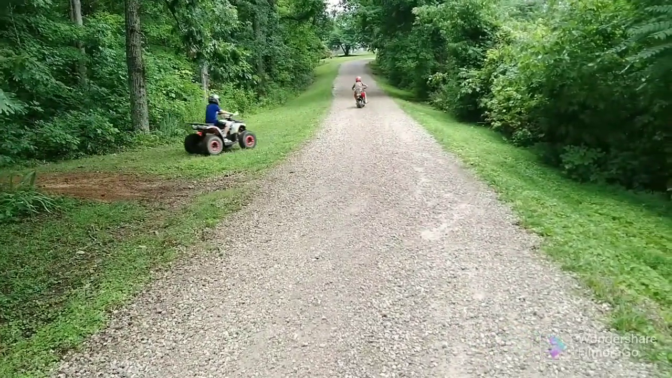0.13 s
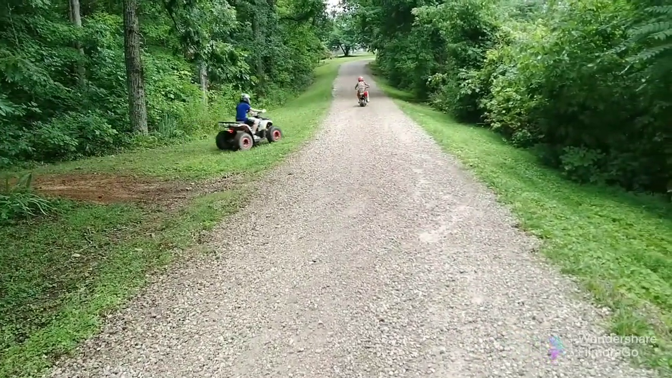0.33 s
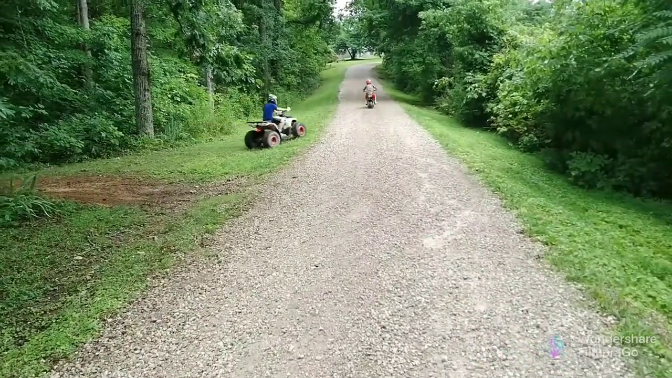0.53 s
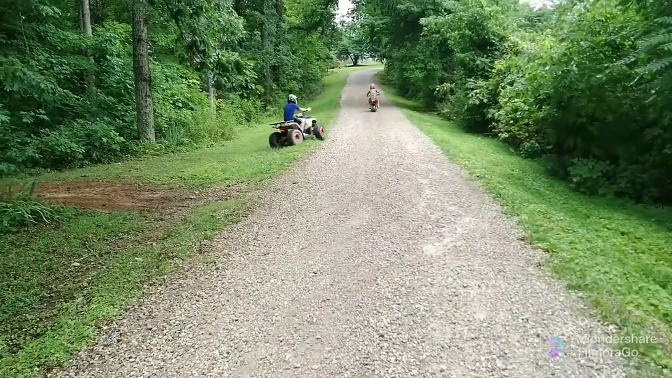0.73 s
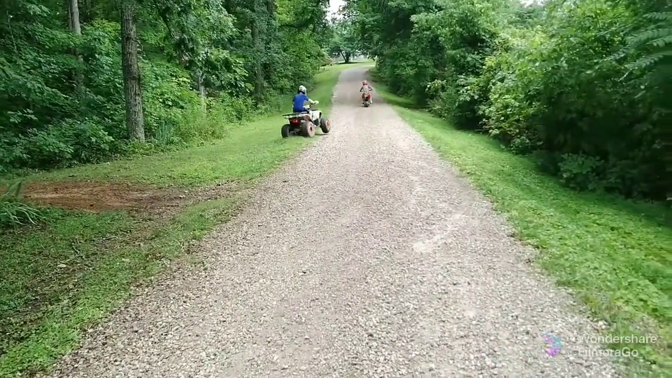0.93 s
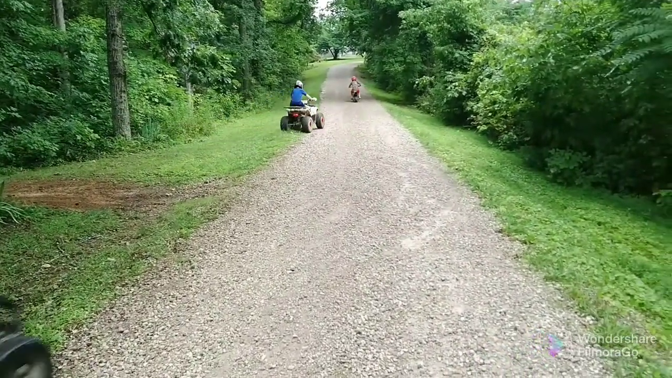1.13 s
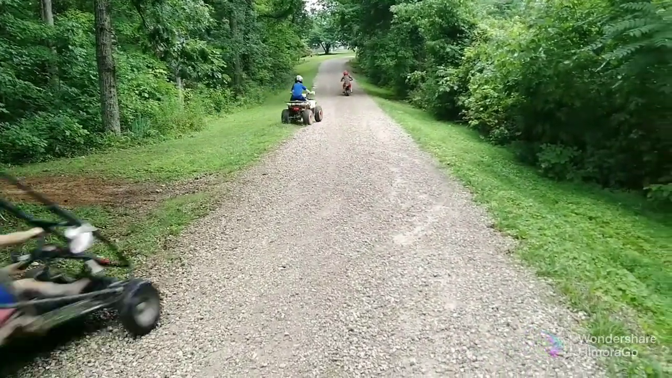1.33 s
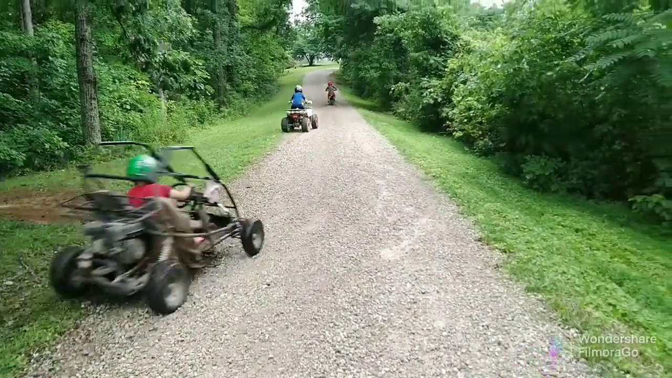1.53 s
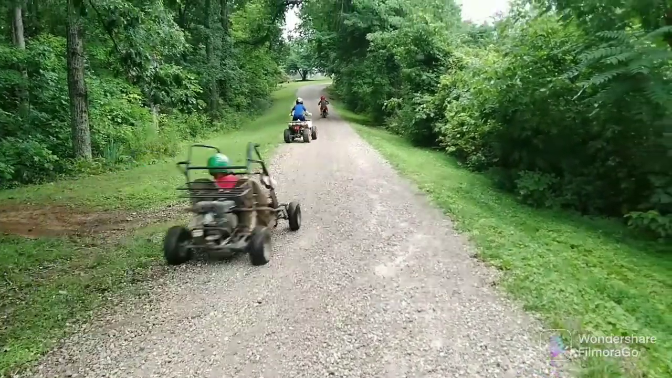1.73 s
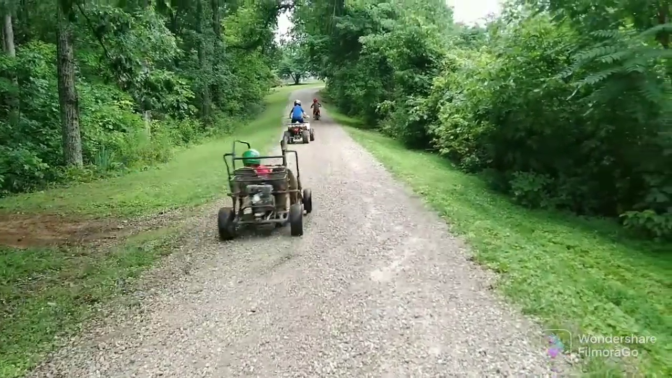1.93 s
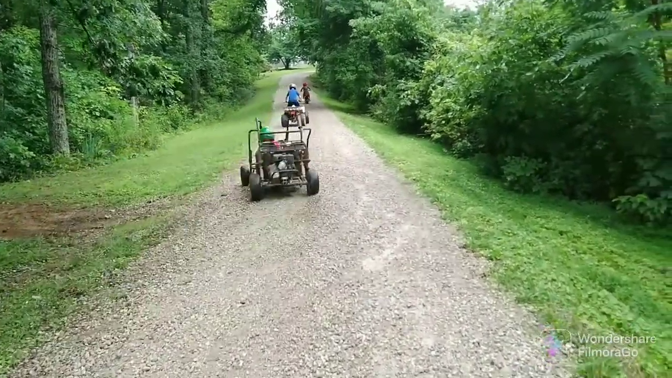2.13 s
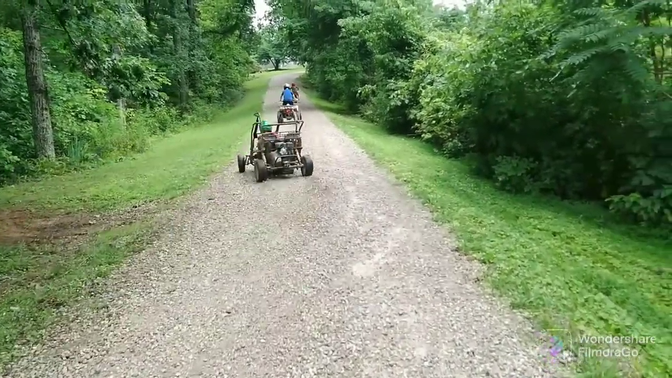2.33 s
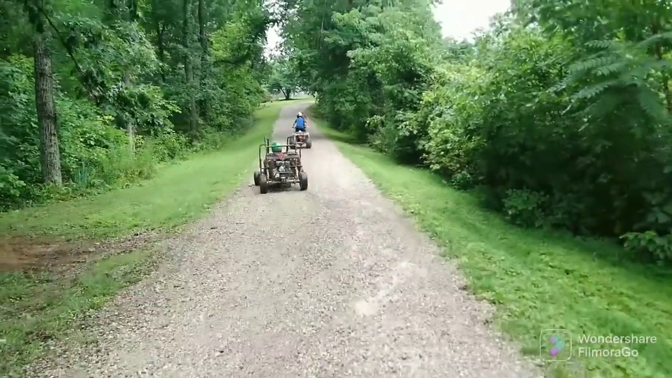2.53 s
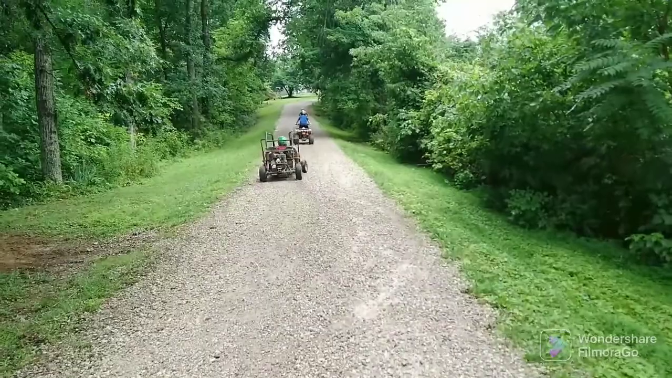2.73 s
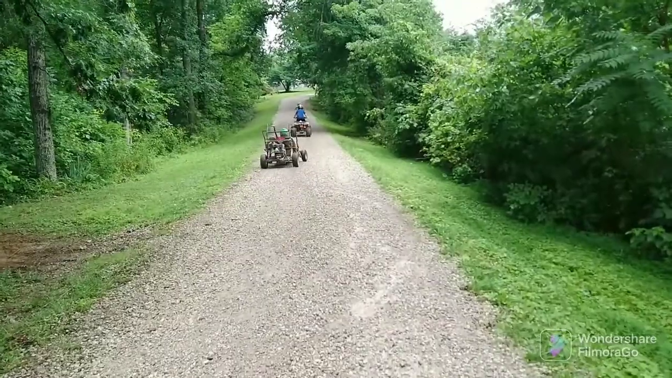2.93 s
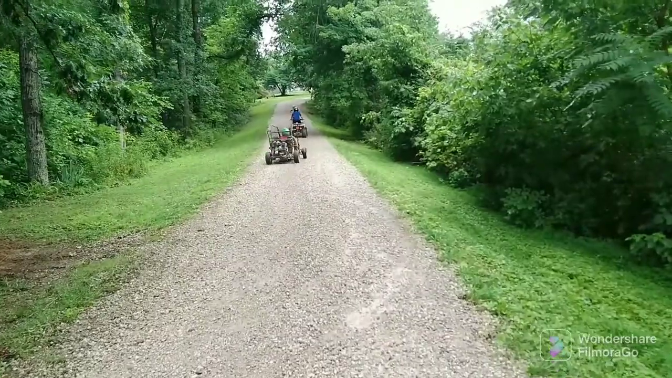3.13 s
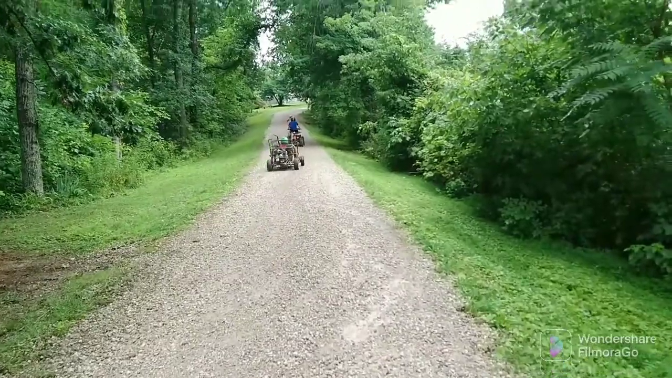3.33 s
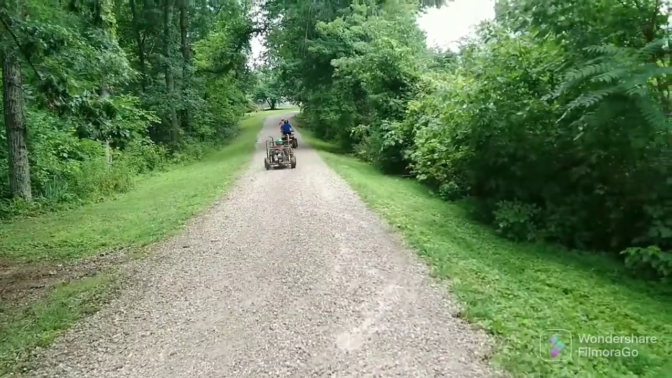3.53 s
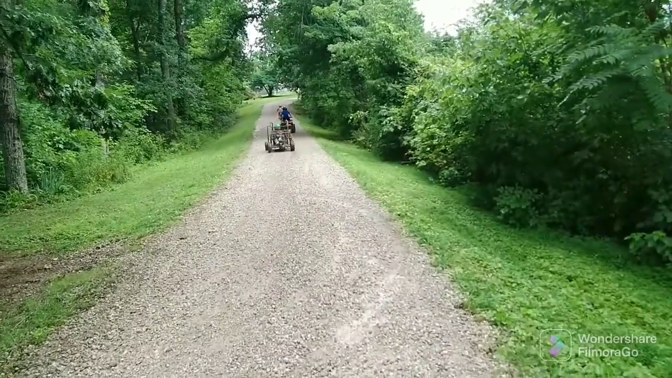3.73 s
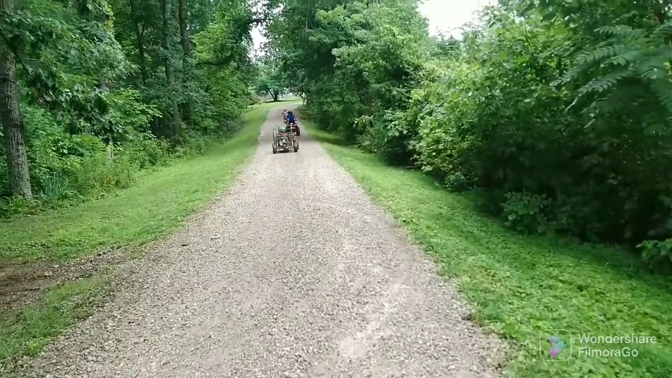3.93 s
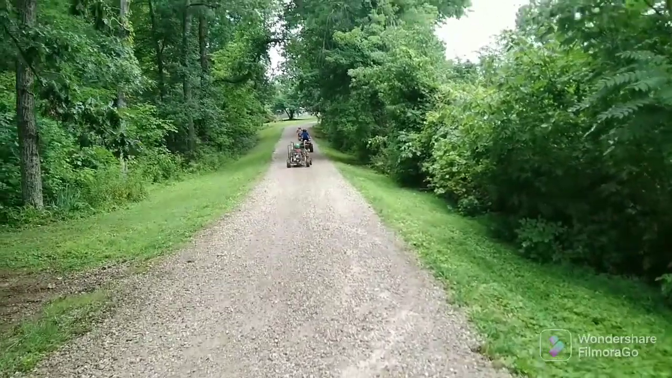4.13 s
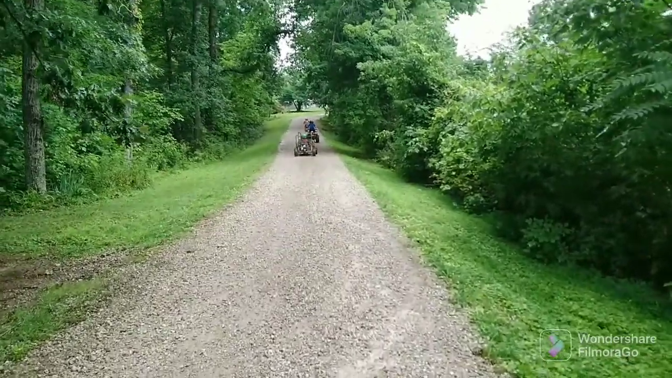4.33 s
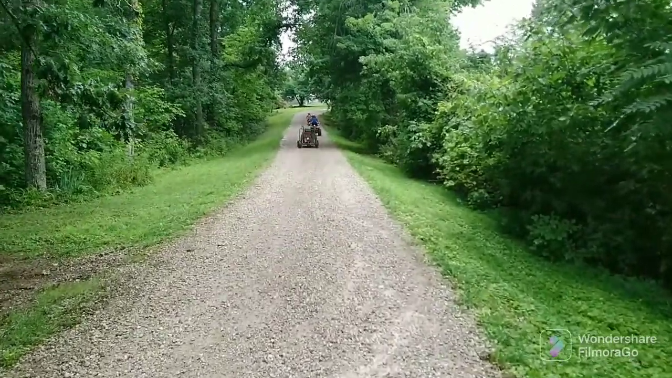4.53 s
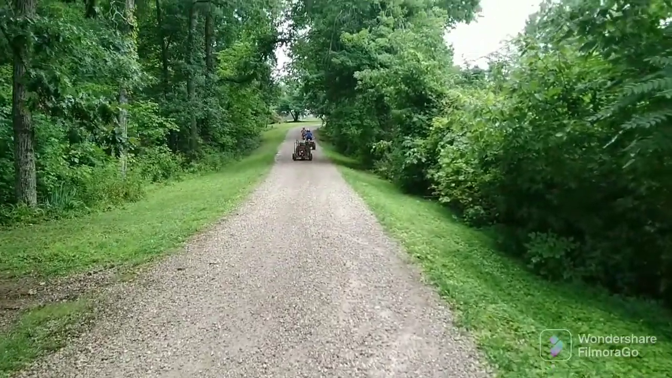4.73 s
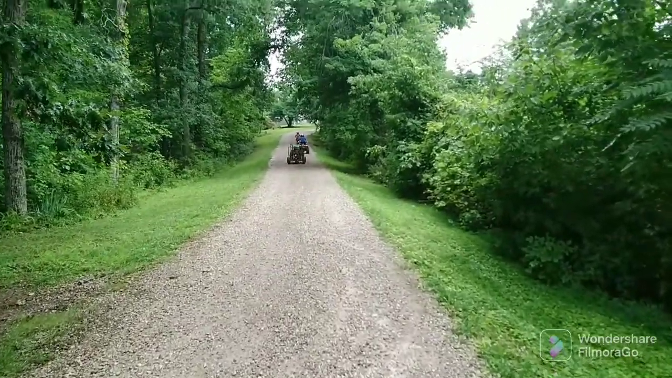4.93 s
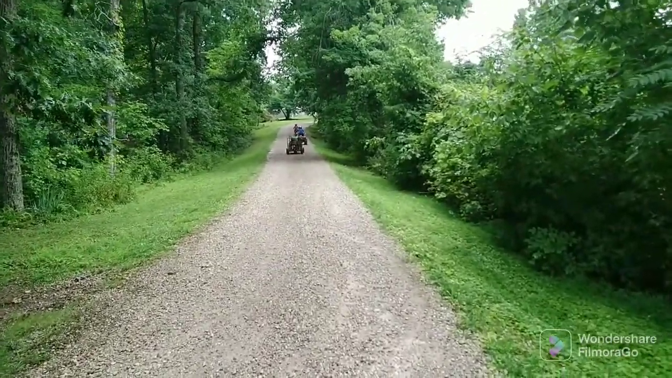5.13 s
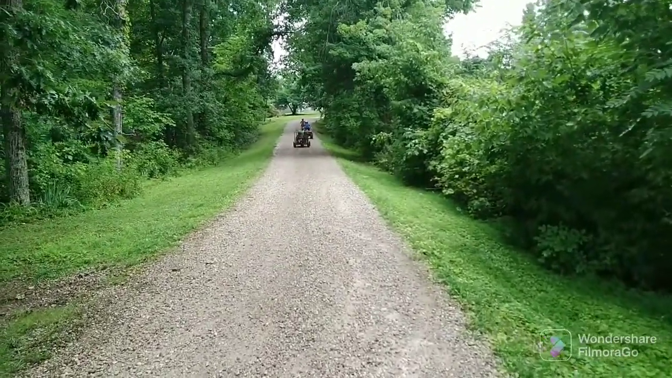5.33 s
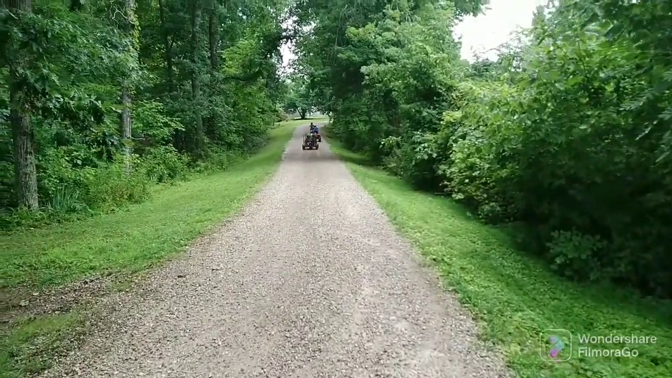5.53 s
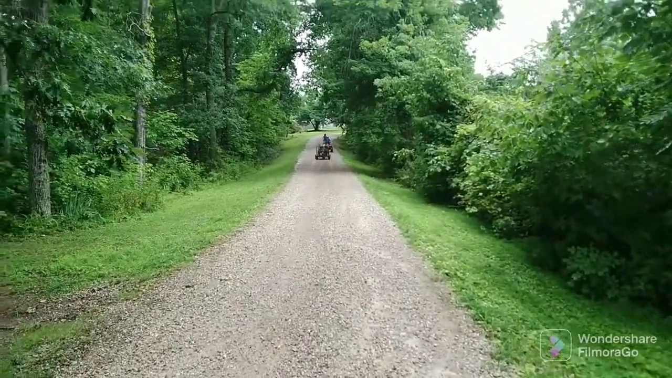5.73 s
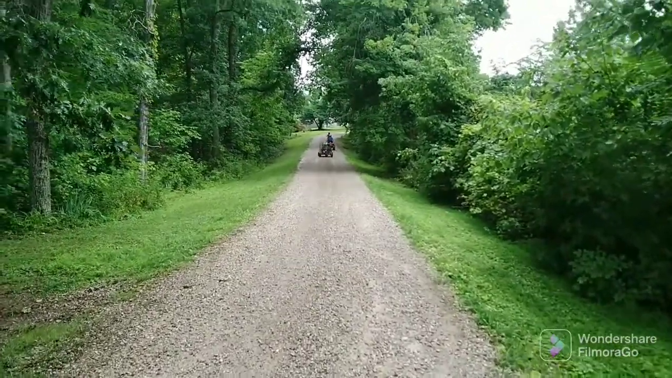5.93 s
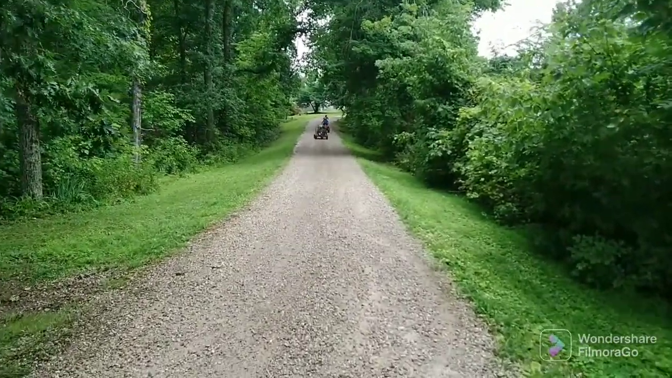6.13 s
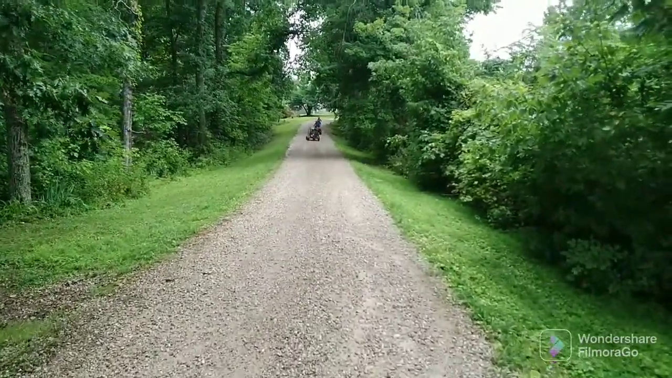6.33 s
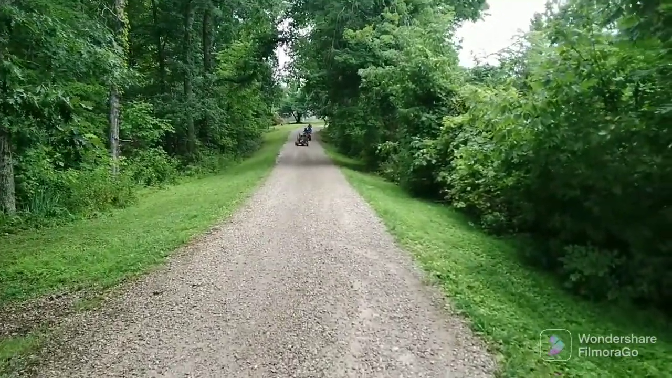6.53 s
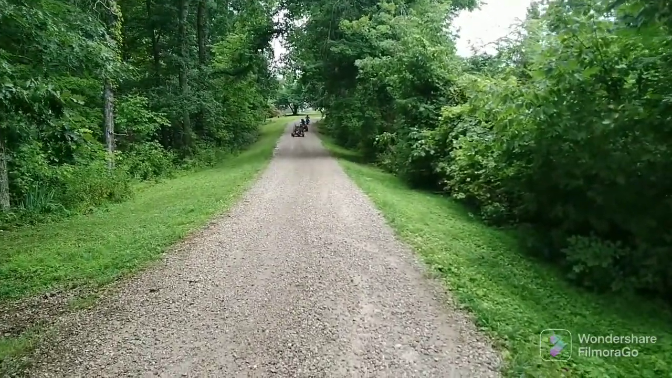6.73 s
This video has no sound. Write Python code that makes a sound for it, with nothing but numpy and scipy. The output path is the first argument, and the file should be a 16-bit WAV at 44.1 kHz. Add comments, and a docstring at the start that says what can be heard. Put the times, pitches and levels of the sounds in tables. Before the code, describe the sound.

Stones crack and steel squeaks as a single-cylinder kart sweeps by in a loud sizzling hiss, which cuts off, leaving a receding clatter.

```python
"""A stone cracks and steel squeaks, then a go-kart hisses and rattles close past on a gravel lane and off into the woods.
Its single-cylinder exhaust thuds in multiples of the firing rate; noise swelling once a firing makes its clatter.
Noise bands follow the kart's distance and facing: tyre crunch, and a loud hiss with a sizzle that stops suddenly.
Squeaks are wandering steel tones, flicked stones are decaying noise, and the trees scatter a short echo.
A second engine ahead winds up slowly and eases off, droning in tones through its resonant pipe."""
import sys
import numpy as np
from scipy import signal
from scipy.fft import rfft, irfft, next_fast_len
from scipy.io import wavfile
from scipy.ndimage import uniform_filter1d, minimum_filter1d, map_coordinates

SR = 44100
rng = np.random.default_rng(int(sys.argv[2]) if len(sys.argv) > 2 else 0)


def to_wav(s):
    """Save 16-bit WAV."""
    ch = np.atleast_2d(s).T  # columns
    pcm = np.round(np.clip(ch, -1, 1) * 32767)  # PCM
    wavfile.write(sys.argv[1], SR, pcm.astype(np.int16))


N = 303408

# Speed of the kart's engine. Each row: time in seconds, firings per second.
KART_FIRING = [(0, 32.02), (.5, 31.79), (1.14, 29.19), (1.34, 26.98), (1.63, 28.99), (2.25, 26.21),
               (2.69, 28.35), (3.34, 30.22), (3.83, 29.28), (4.32, 30.64), (4.59, 27.41), (4.91, 30.09),
               (6.35, 30.72), (6.88, 29.8)]


def kart_cycle():
    """Running count of firings: the integral of the firing rate."""
    rate, = curves(KART_FIRING)
    return np.cumsum(rate) / SR + 1 / 6


# Low exhaust tones. Each row: multiple of the firing rate, relative level in dB.
THUD_ORDERS = [(2, 0.5), (3, -11), (4, -16.5), (5, -8), (6, -12)]
# Higher exhaust tones heard from behind. Each row: multiple of the firing rate, relative level in dB.
REAR_ORDERS = [(3, -3), (5, 0), (6, 2), (7, -2.5), (8, -3.5), (9, 0), (10, -8), (11, -2.5), (12, -6),
               (13, -5.5)]
# Colour of the muffler's puffs from the front. Each row: frequency in Hz, relative level in dB per Hz.
PUFFS_FRONT = [(25, -24), (40, -4), (70, -9), (110, -15), (160, -4.5), (220, -10), (290, -4.5), (380, -6.5),
               (470, -6.5), (700, -20)]
# Colour of the muffler's puffs from behind. Each row: frequency in Hz, relative level in dB per Hz.
PUFFS_REAR = [(25, -32), (42, -8), (90, -10), (115, -5), (170, -5.5), (220, -4.5), (300, 3.5), (380, -5),
              (470, -16.5), (700, -54)]


def exhaust(cycle):
    """Low thud of the kart's pipe; the muffler's puffs and higher tones face backwards."""
    uneven_effort = amp(1.1 * throttle() + 2.3 * wobble(12))
    thud = uneven_effort * tones(cycle, THUD_ORDERS, waver_db=0.5)
    thud = passing(db=-44, fall=1.05, front_db=15.0) * thud

    gate = bursts(cycle, rise=0.14, scatter_db=2.5)
    front = amp(-2.0) * noise(PUFFS_FRONT, 0.56 + gate)
    rear = amp(-4.0) * noise(PUFFS_REAR, 0.75 + gate)
    puffs = turn(front, rear, 1.0, 1.3)
    wash = amp(-5.5) * noise(PUFFS_REAR)  # far away the trees blur the puffs
    muffler = passing(db=-29.5, fall=.9, front_db=-7.5) * turn(puffs, wash, 1.2, 2.85)

    rear_tones = turn(0, tones(cycle, REAR_ORDERS, waver_db=2.0), 1.0, 1.8)
    muffler = muffler + passing(db=-41.5, fall=1.035, front_db=-3) * rear_tones
    return thud + amp(0.45 * throttle()) * muffler


# Clatter heard from the front. Each row: frequency in Hz, relative level in dB per Hz.
RATTLE_FRONT = [(760, -15), (1300, -3), (1800, -5), (2220, -5.5), (2430, -10), (3950, -7.5), (4780, -19),
                (5000, -16), (6500, -40), (11000, -120)]
# Clatter heard close by. Each row: frequency in Hz, relative level in dB per Hz.
RATTLE_NEAR = [(760, -36), (1300, -8), (1740, -5), (2110, 1.5), (2430, -9.5), (2560, -3), (3010, -5.5),
               (3810, -1), (4220, 0), (5000, -3.5), (6500, -40), (11000, -120)]
# Hollower clatter heard from behind. Each row: frequency in Hz, relative level in dB per Hz.
RATTLE_BEHIND = [(760, -43), (1300, -20), (1470, -12), (1690, -2), (2010, -3.5), (2390, 0), (2600, -3.5),
                 (3530, -5.5), (3950, -2), (4810, -16), (5000, -5), (6500, -5), (11000, -120)]
# Clatter heard far off. Each row: frequency in Hz, relative level in dB per Hz.
RATTLE_FAR = [(760, -57), (1300, -30), (1710, -12), (1970, -14.5), (2270, -1.5), (2360, -9), (2470, -14.5),
              (2670, -7.5), (3130, -6), (3490, -11), (3790, -4.5), (3970, -20), (4370, 0.5), (4830, -21),
              (5000, -1.5), (6500, -30), (11000, -120)]
LOUD_S, LOUD_END_S = 0.371, 1.77  # rattle and crunch are stronger between these times


def clatter(cycle):
    """Each firing shakes valve gear and casing; shifting patches vary the ring, which hollows as the kart leaves."""
    gate = bursts(cycle, rise=0.11, scatter_db=0.5)
    grit = amp(0.41 * wobble(700))
    front = noise(RATTLE_FRONT, grit * (3 + gate))
    close = noise(RATTLE_NEAR, grit * (1.1 + gate))
    near = turn(front, close, 0.4, 0.545)
    behind = noise(RATTLE_BEHIND, grit * (turn(0.51, 0.36, 1.3, 1.91) + gate))
    far = noise(RATTLE_FAR, grit * (0.88 + gate))

    casing_ring = [(1500, -14.5), (1700, -4.5), (1950, -14), (2150, -5), (2320, -0.5), (2480, -14)]
    casing = noise(casing_ring, 0.52 + gate)  # carries farthest
    far = far + turn(0, amp(-2) * casing, 4.4, 6.8)

    leaving = turn(near, behind, 1.1, 1.4)
    knock = patchy(turn(leaving, far, 2.6, 3.4), depth_db=2.2, width_hz=300, life=.03)
    running = amp(throttle()) * passing(db=-27.5, fall=1.042, front_db=1.0)
    stronger = held(LOUD_S, LOUD_END_S, attack=0.14, release=0.063)
    stronger = stronger * passing(db=-18, fall=1.45, front_db=-2.5)
    return amp(flickers()[0]) * np.hypot(running, stronger) * knock


# Loud hiss from the front. Each row: frequency in Hz, relative level in dB per Hz.
LOUD_HISS_FRONT = [(2820, -37), (4800, -0.5), (5450, 7), (6160, 1), (7710, 4), (9090, 1), (9700, -22),
                   (12600, -52), (21300, -120)]
# Loud hiss from the side. Each row: frequency in Hz, relative level in dB per Hz.
LOUD_HISS_SIDE = [(2820, -14), (4800, -6.5), (5210, -1), (6040, -1), (7540, 2.5), (10000, -10),
                  (13000, -57), (22000, -120)]
# Quieter hiss far off. Each row: frequency in Hz, relative level in dB per Hz.
QUIET_HISS = [(2710, -19.5), (4600, -2.5), (4800, -5), (5390, -3.5), (5980, -5), (7640, 1), (8720, -1.5),
              (10000, -11), (13000, -32), (22000, -120)]
# Short narrow hiss far off. Each row: frequency in Hz, relative level in dB per Hz.
HISS_BURST = [(2760, -34), (4700, -24), (4860, -28), (5020, -5), (5290, 0), (5710, -8), (6110, -3),
              (6380, -10), (7440, -2), (7780, -13), (7990, -22), (8650, -22), (9500, -32), (12400, -53),
              (20900, -120)]
# Sizzle from the front. Each row: frequency in Hz, relative level in dB per Hz.
BRIGHT_FRONT = [(5530, -35), (9400, 1.5), (11100, -4.5), (12800, -5.5), (15800, -13)]
# Sizzle from the side and behind. Each row: frequency in Hz, relative level in dB per Hz.
BRIGHT_SIDE = [(5530, -20), (9400, -2.5), (10500, -4.5), (13300, -6.5), (15100, -6), (15800, -7)]
# Very brief ringing hisses. Each row: start in seconds, length in seconds, level in dB.
HISS_FLICKS = [(2.35, 0.045, -31.5), (2.57, .03, -35), (2.855, 0.027, -32)]
# Their narrow ring. Each row: frequency in Hz, relative level in dB per Hz.
HISS_RING = [(4400, -15), (5000, -9), (5300, 2), (5700, -6.5), (6500, -16)]
# a brighter sizzle joins the loud hiss, then both stop suddenly
SIZZLE_S, SIZZLE_ATTACK_S, HISS_END_S, HISS_RELEASE_S = 0.503, 0.098, 1.771, 0.11
BURST_S, BURST_LENGTH_S, BURST_DB, BURST_SAG_DB_PER_S = 4.812, 0.47, -28, 11


def drive_hiss(cycle):
    """Noise throbbing with the engine: a loud hiss joined by a sizzle stops suddenly and leaves a quieter hiss."""
    gate = bursts(cycle, rise=.14, scatter_db=2.5)
    grit = amp(0.9 * wobble(900))
    throb = turn(unit(3 + gate), unit(1.23 + gate), 1.0, .9)  # the engine shows once the kart is alongside

    near = turn(noise(LOUD_HISS_FRONT, grit), noise(LOUD_HISS_SIDE), 0.91, 1.19)
    near = throb * patchy(near, depth_db=2.5, width_hz=240, life=.014)
    near = near * loud_hiss() * amp(.5 * flickers()[0])
    near = near * passing(db=-10.5, fall=0.29, front_db=-20.5)

    strong_throb = noise(QUIET_HISS, grit * (2.6 + gate))
    weak_throb = noise(QUIET_HISS, grit * (4.7 + gate))
    far = turn(strong_throb, weak_throb, 2.9, 3.5)
    far = far * (1 - loud_hiss()) * amp(0.94 * throttle())
    far = far * passing(db=-24.5, fall=0.95, front_db=0)

    burst = noise(HISS_BURST, amp(2.0 * wobble(40)) * (3 + gate))
    burst = turn(burst, noise(HISS_RING), 4.88, 5.3)  # narrows to one ring as it fades
    burst_db = BURST_DB - BURST_SAG_DB_PER_S * (np.arange(N) / SR - BURST_S)
    burst = burst * held(BURST_S, BURST_S + BURST_LENGTH_S, attack=0.017, release=0.17) * amp(burst_db)

    sizzle = turn(noise(BRIGHT_FRONT, grit), noise(BRIGHT_SIDE, grit), 0.98, 1.18)
    sizzle = patchy(sizzle, depth_db=2.5, width_hz=407, life=.03)
    sizzle = sizzle * turn(throb, unit(5.6 + gate), 1.5, 1.92)
    loud = held(SIZZLE_S, HISS_END_S, SIZZLE_ATTACK_S, HISS_RELEASE_S)
    loud = loud * passing(db=-15.0, fall=1.54, front_db=-15.5)
    quiet = amp(.5 * (throttle() + flickers()[0])) * passing(db=-34.0, fall=1.15, front_db=-12.0)

    flicks = strokes(HISS_FLICKS, attack=0.0034, release=.025) * noise(HISS_RING)
    return near + far + burst + np.hypot(loud, quiet) * sizzle + flicks


def loud_hiss():
    """1 during the loud hiss, falling to 0 as it stops."""
    return np.clip((HISS_END_S - np.arange(N) / SR) / HISS_RELEASE_S + 1, 0, 1)


# Gravel crunch from the front. Each row: frequency in Hz, relative level in dB per Hz.
GRAVEL_FRONT = [(120, -51), (200, -31), (225, -18), (271, -16), (367, -0.5), (406, -1.5), (453, 0.5),
                (523, -1), (691, -1), (846, -4), (920, -7), (1500, -9), (1950, -31), (3300, -120)]
# Gravel crunch from the side. Each row: frequency in Hz, relative level in dB per Hz.
GRAVEL_SIDE = [(240, -40), (400, -12.5), (690, -13), (800, -9), (930, 2), (1000, 2.5), (1150, 1.5),
               (1460, -14.5), (1600, -22), (2080, -32), (3520, -120)]
# Gravel crunch far off. Each row: frequency in Hz, relative level in dB per Hz.
GRAVEL_FAR = [(240, -44), (400, -1.5), (488, -10), (539, -8), (616, -2), (803, -2.5), (907, -1.5),
              (1140, -15.5), (1500, -8.5), (1950, -20), (3300, -120)]


def gravel(cycle):
    """Stones under the tyres drum on the frame in dense uneven grains, ringing its tubes."""
    grains = amp(3.25 * wobble(450))
    front = noise(GRAVEL_FRONT, grains)
    side = noise(GRAVEL_SIDE, grains)
    far_grains = amp(1.45 * wobble(200)) * (13 + bursts(cycle, rise=0.072, scatter_db=6.5))
    far = noise(GRAVEL_FAR, far_grains)
    near = turn(amp(1.5) * front, side, 1.05, 1.24)
    crunch = patchy(turn(near, far, 1.7, 2.1), depth_db=3, width_hz=90, life=.06)

    rolling = amp(.5 * throttle()) * passing(db=-41.5, fall=0.47, front_db=7)
    stronger = held(LOUD_S, LOUD_END_S, attack=0.032, release=0.045)
    stronger = stronger * passing(db=-26, fall=2.3, front_db=7.5)
    return amp(flickers()[1]) * np.hypot(rolling, stronger) * crunch


# Stones and frame knocks. Each row: start in seconds, relative crack level in dB, relative body level in dB.
STONE_HITS = [(0.0283, -4.5, -33), (0.2114, -22, -32), (0.543, 0, -19), (0.6388, -1, -12), (0.6682, 3, -20),
              (0.783, -0.5, -31), (0.852, -2, -15), (0.951, 2, -18), (2.423, -10, -49), (2.472, -13, -34)]


def knocks():
    """Flicked stones and knocks: a bright crack and a dull push of the frame; the crack is duller on approach."""
    t = np.arange(N) / SR
    crack, push = np.zeros(N), np.zeros(N)
    for s, crack_db, body_db in STONE_HITS:
        age = np.maximum(t - s, 0)
        crack += (t > s) * amp(crack_db - 60 * age / 0.11)  # falls 60 dB in 0.11 s
        push += (t > s) * amp(body_db - 60 * age / 0.04)
    # (Hz, relative dB per Hz)
    stone = [(1300, -25), (2000, 2), (5000, 0.5), (8500, 6), (11000, -4.5), (15800, -9)]
    dull = [(1300, -24), (2000, 2), (5000, 2), (9200, 6.5), (9900, -24), (15800, -32)]
    bright = amp(-13.0) * crack * turn(noise(dull), noise(stone), .55, 0.91)
    return bright + amp(-3.5) * push * noise(GRAVEL_FRONT)


# Steel rubbing. Each row: start in seconds, length in seconds, level in dB.
STEEL_RUBS = [(.028, 0.074, -21.5), (.535, 0.021, -17.5), (.89, 0.018, -14.5)]
# Modes of the steel part. Each row: frequency in Hz, size of its random wander in Hz, relative level in dB.
STEEL_MODES = [(2580, 21, -11.5), (3304, 28, -5.5), (4010, 29, 1.5), (4550, 40, -5), (5440, 40, -5),
               (6730, 24, -10)]


def squeaks():
    """Brief rubbing sings in the narrow modes of a steel part."""
    ring = np.zeros(N)
    for hz, wander_hz, db in STEEL_MODES:
        level = amp(db + 2.8 * wobble(85.5))
        phase = 2 * np.pi * np.cumsum(hz + wander_hz * wobble(300)) / SR
        ring += level * np.sin(phase)
    return strokes(STEEL_RUBS, attack=0.0021, release=0.0059) * unit(ring)


# Throaty swells of the far muffler. Each row: start in seconds, length in seconds, level in dB.
THROATY_SWELLS = [(4.95, 0.014, -39), (5.28, .22, -49)]


def burbles(cycle):
    """Firings excite a narrow resonance of the muffler as the load changes."""
    throat = [(720, -19), (830, -7), (900, 2), (1000, -4), (1080, -20)]  # (Hz, relative dB per Hz)
    throb = 0.5 + bursts(cycle, rise=0.12, scatter_db=4.0)
    return strokes(THROATY_SWELLS, attack=0.0069, release=0.027) * noise(throat, throb)


# Throttle pressed or lifted. Each row: start in seconds, length in seconds, change of effort in dB.
PEDAL = [(2.45, 0.73, 2.5), (3.844, 0.51, 1.4), (4.544, 0.14, -4), (4.77, 0.36, 3), (5.272, 0.54, 2.5),
         (6.38, 0.26, 1.5), (6.8, .1, -3.5)]


def throttle():
    """Change of the engine's effort in dB, which each layer follows by its own share."""
    return sum(db * held(s, s + length, attack=0.045, release=0.054) for s, length, db in PEDAL)


# Brief changes of level, up or down. Each row: start in seconds, length in seconds, change of the rattle in dB,
# change of the low drumming in dB.
LEVEL_FLICKERS = [(.028, 0.057, 7, -1), (0.207, 0.04, 8.5, 7), (0.389, 0.028, 4.5, 2),
                  (0.531, 0.026, 3.5, -2), (0.655, 0.031, 4.5, 0.5), (0.934, 0.026, 1, 2),
                  (1.237, .03, 2, 8.5), (1.55, 0.027, 2.5, 5.5), (1.748, 0.022, 1, 7.5),
                  (2.66, 0.034, -1.5, 2.5), (5.696, 0.034, -3.5, 5.5), (6.343, 0.17, 0.5, 2.5)]


def flickers():
    """Brief changes of rattle and low drumming, in dB, up or down."""
    return sum(np.outer(changes, held(s, s + length, attack=0.0062, release=0.048))
               for s, length, *changes in LEVEL_FLICKERS)


# the kart's straight path: when and how near it passes, how fast it goes
PASS_S, MISS_M, SPEED_M_PER_S = .85, 1.973, 4.0


def passing(db, fall, front_db):
    """Gain of a part of the kart: db at miss distance, falling as distance ** -fall, plus front_db by how it faces us."""
    ahead = SPEED_M_PER_S * (np.arange(N) / SR - PASS_S)
    distance = np.hypot(MISS_M, ahead)
    facing = ((1 - ahead / distance) / 2) ** 2  # 1 head-on, 1/4 abreast, 0 from behind
    return amp(db + front_db * facing) * (MISS_M / distance) ** fall


# Speed of the engine ahead. Each row: time in seconds, firings per second before a slight jitter.
AHEAD_FIRING = [(1.8, 39.0), (2.6, 41.7), (4.0, 48.7), (4.5, 50.6), (5.4, 52.6), (5.9, 52.0), (6.2, 49),
                (6.88, 46)]
# Its hum. Each row: multiple of the firing rate, relative level in dB.
AHEAD_HUM = [(2, -6), (3, -6), (4, -0.5), (5, -17)]
# Its muffler drone. Each row: multiple of the firing rate, relative level in dB.
AHEAD_DRONE = [(6, 4), (7, -7), (9, -16), (12, -13.5), (13, -14)]
AHEAD_IN_S, AHEAD_OFF_S, AHEAD_RELEASE_S = 1.44, 5.5, 0.58  # opens up, eases off, and how slowly it dies
# firing rate at which its pipe resonates, half-width and height of that peak
PIPE_RATE_HZ, PIPE_WIDTH_HZ, PIPE_DB = 52, 1.9, 5.5


def engine_ahead(drone_db=-55.5, hum_db=-46, recede_db_per_s=1.7):
    """A faster engine drones, most where its pipe resonates; off the throttle only its third order stays."""
    rate, = curves(AHEAD_FIRING)
    cycle = np.cumsum(rate * (1 + .003 * wobble(20))) / SR
    resonance_db = PIPE_DB / (1 + ((rate - PIPE_RATE_HZ) / PIPE_WIDTH_HZ) ** 2)
    drone = amp(drone_db + resonance_db) * tones(cycle, AHEAD_DRONE, waver_db=2.5)
    receding_db = hum_db - recede_db_per_s * (np.arange(N) / SR - AHEAD_IN_S)
    hum = amp(receding_db) * tones(cycle, AHEAD_HUM, waver_db=1.5)
    coast = turn(0, tones(cycle, [(3, -55.5)], waver_db=0.0), 5.0, 5.9)
    pulling = held(AHEAD_IN_S, AHEAD_OFF_S, attack=1.1, release=AHEAD_RELEASE_S)
    return pulling * (drone + hum) + coast


# Decay of the echo among the trees. Each row: frequency in Hz, time to fall 60 dB in seconds.
WOODS_DECAY = [(100, 0.44), (2000, 0.16), (12000, 0.048)]


def woods(x):
    """Trunks and leaves scatter a short tail: noise that dies faster at high frequencies."""
    hz, t, z = signal.stft(rng.standard_normal(SR // 2), SR, nperseg=256)
    decay = amp(-60 * t / along(WOODS_DECAY, hz)[:, None])
    tail = signal.istft(z * decay, SR, nperseg=256)[1]
    return signal.fftconvolve(x, tail / np.linalg.norm(tail))[:N]


def tones(cycle, orders, waver_db):
    """Multiples of the firing rate, each wavering slowly in level and phase on its own."""
    total = 0
    for order, db in orders:
        level = amp(db + waver_db * wobble(3.99))
        phase = 2 * np.pi * (round(order) * cycle + rng.random()) + 0.12 * wobble(8)
        total = total + level * np.sin(phase)
    return np.sqrt(2) * total


def bursts(cycle, rise, scatter_db):
    """One swell a cycle, peaking after the share 'rise' of it, each of its own strength."""
    u = cycle % 1 / rise
    strength = amp(scatter_db * rng.standard_normal(1024))
    return strength[cycle.astype(int) % len(strength)] * (u * np.exp(1 - u)) ** 2


def strokes(rows, attack, release):
    """Loudness curve of brief sounds, from rows of (s, length s, dB)."""
    return sum(amp(db) * held(s, s + length, attack, release) for s, length, db in rows)


def patchy(x, depth_db, width_hz, life):
    """Passing resonances: patches of random gain, width_hz wide and life seconds long."""
    hz, t, z = signal.stft(x, SR, nperseg=512)
    knots = rng.standard_normal((400, 1200))
    grid = np.meshgrid(hz / width_hz, t / life, indexing="ij")
    field = map_coordinates(knots, grid, order=1, mode="wrap")
    return unit(signal.istft(z * amp(depth_db * unit(field)), SR, nperseg=512)[1][:N])


def noise(spectrum, gate=1):
    """Fresh noise, gated, then coloured."""
    return coloured(gate * rng.standard_normal(N), spectrum)


def coloured(x, spectrum):
    """x with the given spectrum, rms 1; beyond its ends the spectrum falls steeply."""
    low, high = spectrum[0][0], spectrum[-1][0]

    def response(hz):
        skirt = np.minimum(1, np.minimum(hz / low, high / (hz + 1))) ** 8
        return amp(along(spectrum, hz)) * skirt

    return unit(filtered(x, response))


def filtered(x, response):
    """x times a response of frequency."""
    m = next_fast_len(N + SR // 2)
    return irfft(rfft(x, m) * response(np.fft.rfftfreq(m, 1 / SR)), m)[:N]


def turn(a, b, start, end):
    """Equal-power change from sound a to sound b."""
    share = np.clip((np.arange(N) / SR - start) / max(end - start, .01), 0, 1)
    return np.sqrt(1 - share) * a + np.sqrt(share) * b


def held(start, end, attack, release):
    """Rises from 0 to 1 after start, holds, and falls back after end."""
    t = np.arange(N) / SR
    return np.clip(np.minimum((t - start) / attack, (end - t) / release + 1), 0, 1)


def wobble(rate):
    """A smooth random curve, rate knots a second."""
    knots = rng.standard_normal(int(N * rate / SR) + 4)
    return map_coordinates(knots, [np.arange(N) * rate / SR])


def curves(rows):
    """One value per sample for each column after the time."""
    s, *cols = np.transpose(rows)
    return [np.interp(np.arange(N) / SR, s, c) for c in cols]


def along(points, hz):
    """Reads (Hz, value) points on a log frequency axis."""
    f, v = np.transpose(points)
    return np.interp(np.log(hz + 1), np.log(f + 1), v)


def amp(db):
    """Decibels to amplitude."""
    return 10 ** (np.asarray(db) / 20)


def unit(x):
    """x scaled to rms 1."""
    return x / np.sqrt(np.mean(x ** 2) + 1e-20)


def scene():
    """The kart's layers and the engine ahead; only the kart's bright layers echo in the woods."""
    cycle = kart_cycle()
    bright = clatter(cycle) + drive_hiss(cycle) + gravel(cycle) + burbles(cycle) + knocks() + squeaks()
    return (bright + amp(-22.0) * woods(bright) + exhaust(cycle) + engine_ahead())[None]


TOP_HZ = 15800  # band limit


def record(dry, ceiling=0.93):
    """A fast limiter holds down peaks above the ceiling; nothing is kept above the band limit."""
    needed = np.minimum(1, ceiling / (np.abs(dry[0]) + 1e-9))
    gain = uniform_filter1d(minimum_filter1d(needed, size=40), size=40)  # 40 samples, about 0.9 ms
    return filtered(gain * dry[0], lambda hz: hz < TOP_HZ)[None]


dry = scene()
out = record(dry)
to_wav(out)
```